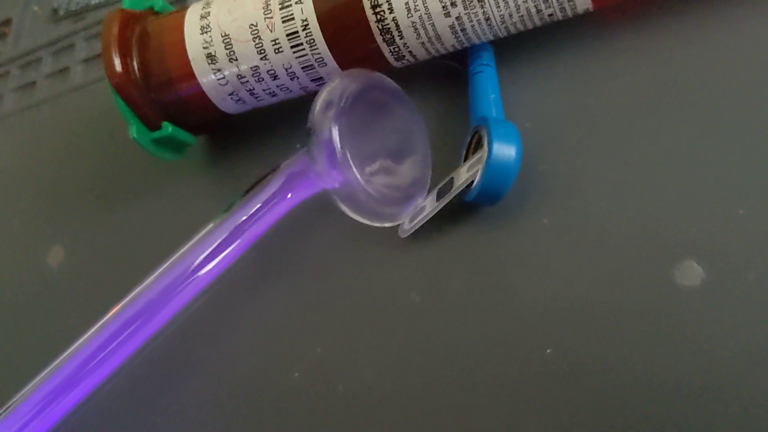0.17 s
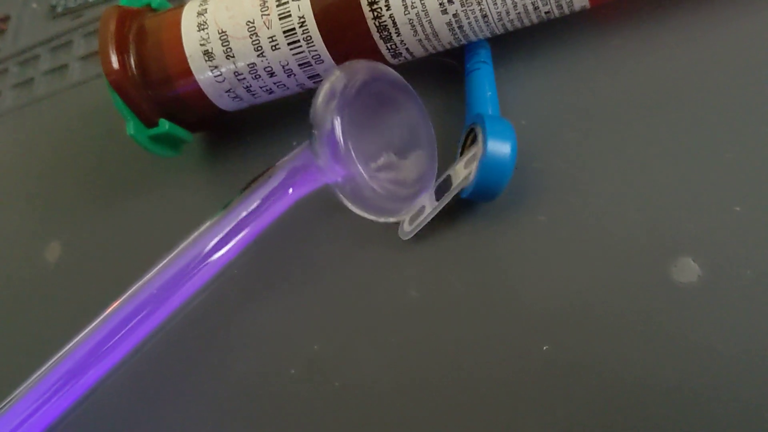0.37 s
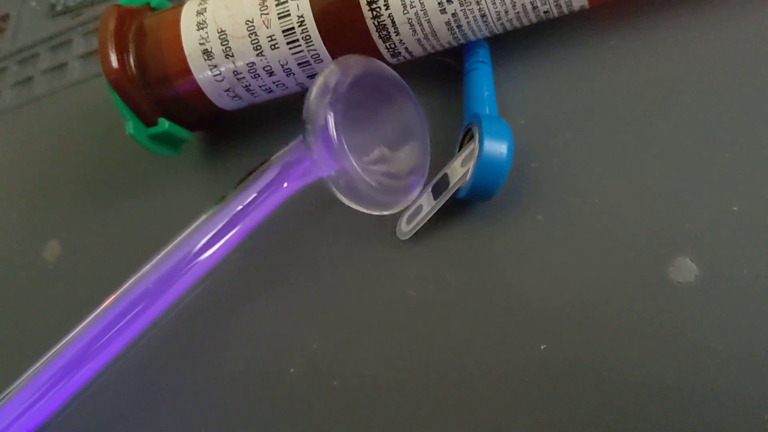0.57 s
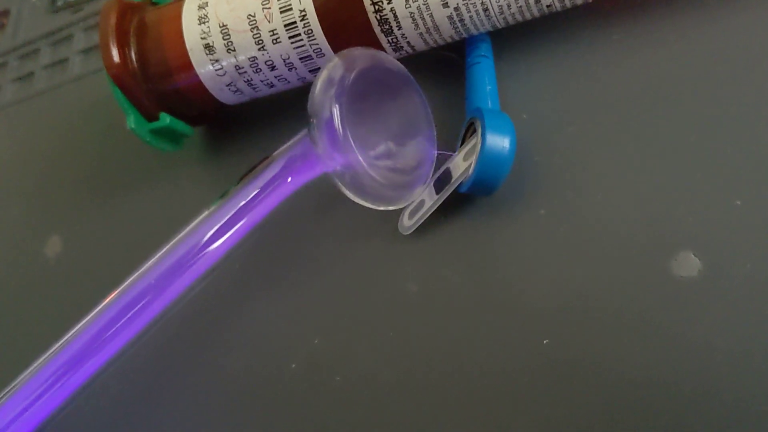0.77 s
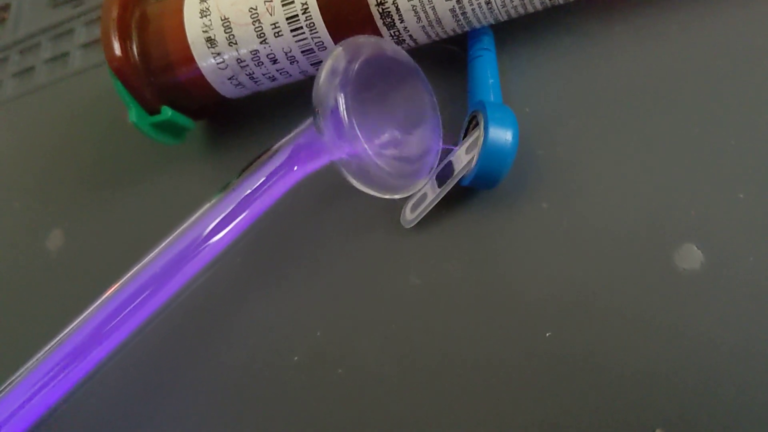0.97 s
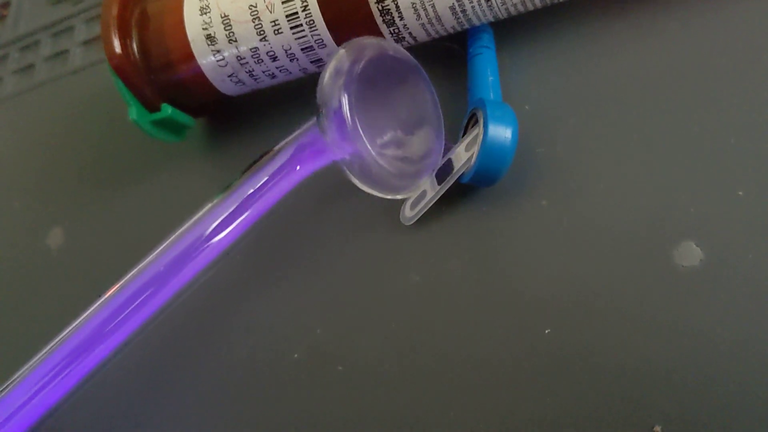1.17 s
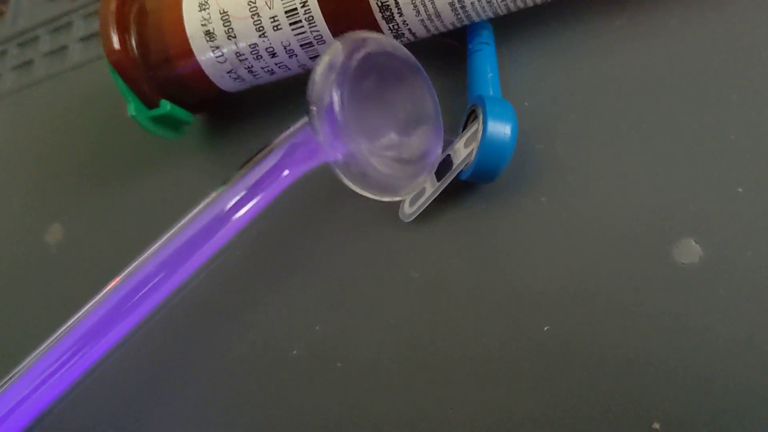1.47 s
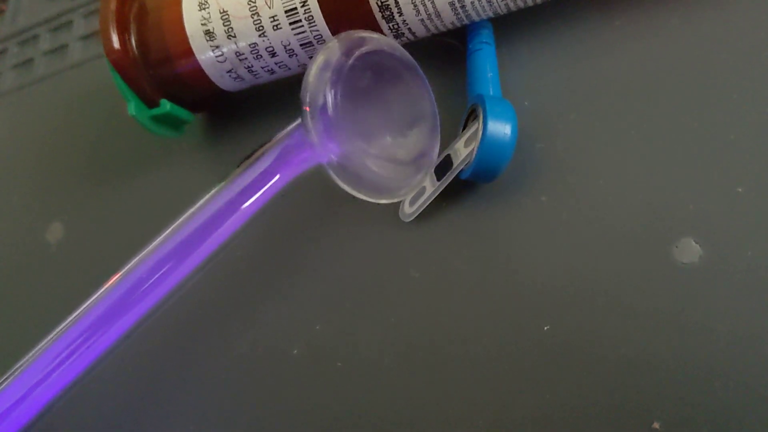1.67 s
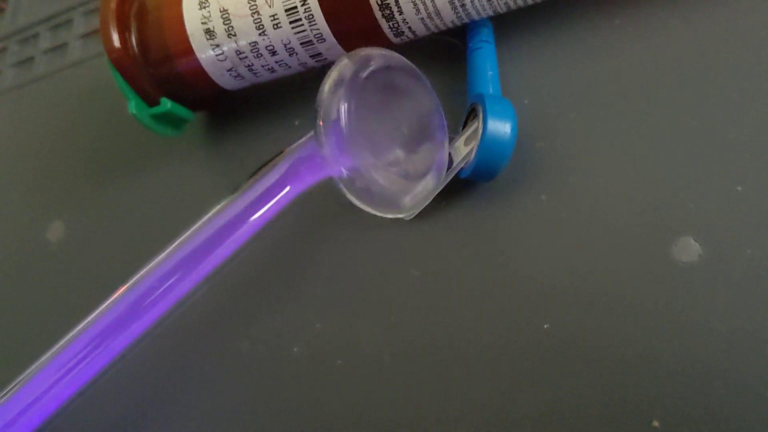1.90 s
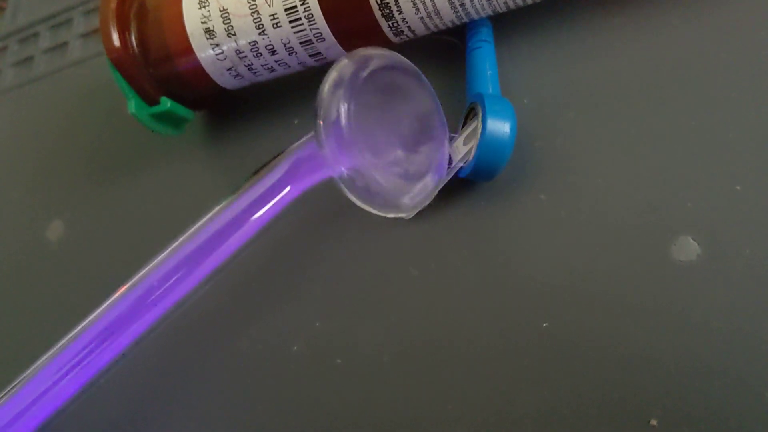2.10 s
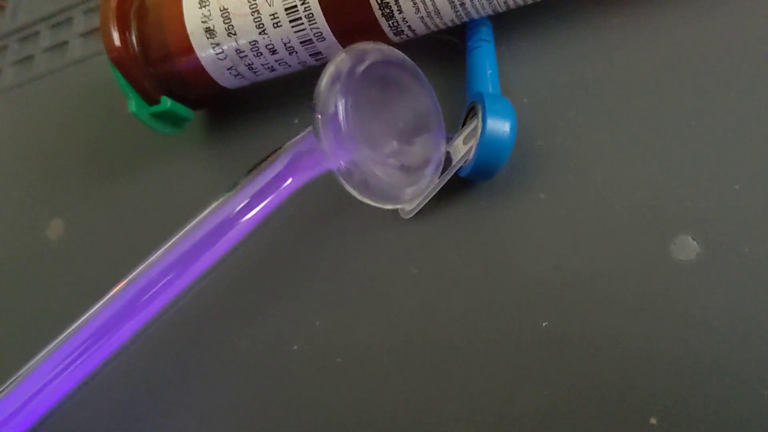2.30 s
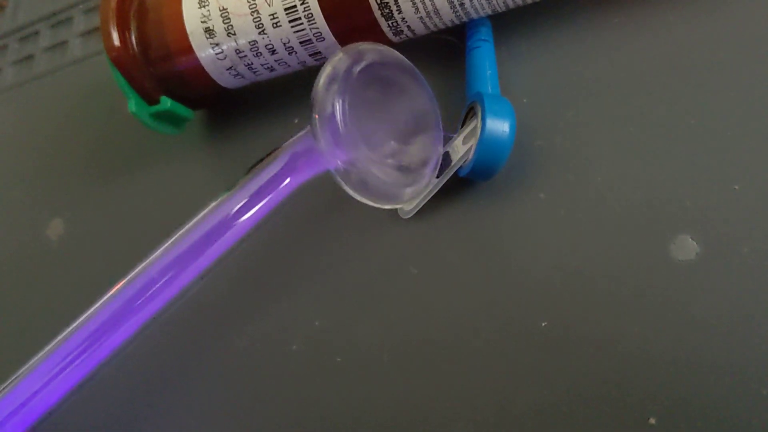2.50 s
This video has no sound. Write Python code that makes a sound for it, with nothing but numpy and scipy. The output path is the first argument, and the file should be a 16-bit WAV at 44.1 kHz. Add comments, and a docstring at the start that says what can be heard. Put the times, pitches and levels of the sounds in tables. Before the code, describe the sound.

An electrical wand buzzes with a high, hissing edge, close to the microphone in a small dry room. Sharp sparks then snap to a metal key with a few low thumps, followed by a denser, brighter crackle.

```python
"""A violet wand buzzes close to a microphone in a small dry room, over faint handling rumble: its glass
electrode discharges at every half-cycle of the mains. From 0.9 s, as it nears and touches a small metal
key, single discharges jump as loud sparks. Some discharges, loud or faint, kick the right microphone
port electrically as falling thumps. At 1.6 s the corona thins briefly to an even tick. A dense run of
brighter sparks follows at 2 s, and a last pair jumps at 2.5 s."""
import sys
import numpy as np
from scipy import signal
from scipy.fft import rfft, irfft, next_fast_len
from scipy.io import wavfile

SR = 44100
rng = np.random.default_rng(int(sys.argv[2]) if len(sys.argv) > 2 else 0)


def inscribe(sig):
    """Save sig as 16-bit PCM at rate SR to the path in sys.argv[1].

    A 1-D sig is mono; a 2-D sig holds one channel per row.
    Samples are clipped to [-1, 1] before scaling.
    """
    pcm = np.round(np.clip(np.atleast_2d(sig).T, -1, 1) * 32767)
    wavfile.write(sys.argv[1], SR, pcm.astype(np.int16))


N = 116865
FFT_SIZE = next_fast_len(N + SR // 2)
HZ = np.fft.rfftfreq(FFT_SIZE, 1 / SR)
TIME = np.arange(N) / SR
PULSE_HZ, FIRST_PULSE_S = 120.012, 0.00137  # two discharges per mains cycle
TREBLE_HZ, TOP_HZ = 13000, 16900  # boundary between body and treble; upper band limit

# Corona strength at each port: time_s, level_db, treble_over_body_db
CORONA_AT_LEFT = [(0, -49, 8), (0.1, -44, 7), (0.3, -47, 2), (0.85, -44.5, 6.5), (1.05, -40, 8),
                  (1.15, -43, 9), (1.4, -39.5, 10), (1.6, -41.5, 9.5), (1.88, -39, 10), (2.15, -40, 8),
                  (2.25, -41, 7), (2.65, -45, 6.5)]
CORONA_AT_RIGHT = [(0, -34.5, 3), (0.1, -32.5, 3), (0.16, -35.5, 0), (0.42, -31.5, -1), (0.85, -32, 0.5),
                   (0.96, -41, -4), (1.06, -35.0, -2), (1.12, -40.5, -3), (1.22, -33.5, 0.5),
                   (1.3, -31.5, 0), (1.47, -30.5, 1), (1.6, -30, 4.5), (1.88, -26, 7), (2.0, -28, 2),
                   (2.08, -43, 7), (2.18, -41, -3), (2.24, -40, 4), (2.38, -31, 1.8), (2.49, -28, 2.3),
                   (2.55, -39.5, 1.8), (2.65, -33, 3.3)]
# Sparks to the key: start_s, left_db, right_db, treble_over_body_db
SPARK_EVENTS = [(0.885, -23.5, -26, -0.5), (0.893, -40, -19, 5), (0.901, -34, -21.5, 3),
                (0.91, -29, -25.5, 5), (0.918, -23, -21, 3.5), (0.935, -28, -18, 3),
                (0.943, -29.5, -25, 5.5), (0.976, -31.5, -28, 5.5), (0.985, -31.5, -27.5, 3.5),
                (1.043, -20.5, -22.5, 5), (1.051, -24.5, -40, 7), (1.076, -25, -20.5, 7.5),
                (1.093, -29.5, -29, 7), (1.176, -27, -21.5, 6), (1.26, -28.5, -21, 2),
                (1.393, -33, -24, 5.5), (1.426, -38, -27, 0.5), (1.585, -39, -28, 9),
                (1.601, -38, -24.5, 10), (1.785, -35.5, -23.5, 13), (2.026, -26, -21.5, 12.5),
                (2.035, -18.5, -16, 9.5), (2.043, -25, -21, 8), (2.06, -23.5, -18.5, 12.5),
                (2.068, -24, -21, 7), (2.101, -27, -18.5, 9.5), (2.109, -24, -24, 6), (2.118, -26, -19, 9),
                (2.134, -23, -20.5, 9), (2.151, -24, -25, 8), (2.159, -29, -28, 9), (2.168, -30, -17, 11),
                (2.176, -17.5, -19, 9.5), (2.184, -29.5, -39, 13), (2.209, -32, -27.5, 6.5),
                (2.509, -21, -15, 11.5), (2.518, -27, -21, 6.5)]
# Electrical kicks to the microphone: start_s, level_db, polarity
THUMP_EVENTS = [(.885, -48, 1), (.918, -43, 1), (.935, -19.5, 1), (1.018, -34, 1), (1.043, -20.5, 1),
                (1.051, -29, -1), (1.851, -26, 1), (1.86, -29, 1), (2.001, -35, 1), (2.06, -33.5, -1),
                (2.068, -30, 1), (2.176, -31, -1), (2.376, -40, -1), (2.485, -34, -1)]
# Relative spectra of the three kinds of discharge: frequency_hz, left_db, right_db
CORONA_SPECTRUM = [(102, -35.5, -47.5), (830, -34, -33), (1400, -22, -27.5), (1690, -23.5, -25.5),
                   (2190, -16.5, -16.5), (2760, -18.5, -22), (3774, -23.5, -21.5), (4433, -13, -4.5),
                   (5210, -16.5, -22.5), (5890, -7.5, -22.5), (7040, -17.5, -5.5), (7470, -6, -21.5),
                   (8090, -10, -3.5), (8500, -5, -23), (9070, -25.5, -3.5), (9920, -27, -11.5),
                   (11390, -5, -2.0), (12000, -21, -5.5), (12900, -29, -5.5), (13460, -18, -2.5),
                   (15460, 6, 2), (16380, -9, -15), (16700, -40, -40.5)]
TICK_SPECTRUM = [(100, -22, -31), (900, -21.5, -27.5), (2300, -32, -22), (3280, -19, -20), (4450, 1, -7),
                 (5500, -22, -17), (6940, -2, -18), (7700, -14, -20.5), (9900, -11, 2), (11650, -15, -4.5),
                 (13000, -17.0, -15), (14900, 0.0, -4), (16500, -33, -26)]
SPARK_SPECTRUM = [(100, -41, -50), (700, -37.5, -38), (1530, -33, -28), (2500, -23, -17),
                  (3460, -21.5, -14), (4600, -20, -16.0), (5270, -18.5, -21.5), (6900, -13, -12),
                  (8260, -14.5, -8.5), (11600, -20.0, -8.0), (12700, -8.5, -13.5), (13700, -15, -4.5),
                  (15250, 18, 9), (16640, -27, -19)]
# Relative spectra of thump, rumble and hiss: frequency_hz, gain_db
THUMP_SPECTRUM = [(20, -45), (35, -23), (50, -6.5), (70, 2.5), (150, -2), (220, -0.5), (500, -4.5),
                  (950, -9.5), (1400, -5.5), (1550, -16), (2300, -9.5), (3300, -16), (5000, -36),
                  (16000, -53)]
RUMBLE_SPECTRUM = [(20, -30), (40, -13), (62, 2.5), (100, -5), (200, -12.5), (500, -18), (1000, -27.5),
                   (4000, -57)]
HISS_SPECTRUM = [(30, -13), (200, -3), (1000, 3.5), (4000, 4), (16000, -14.5)]
# Group delay of a thump, longest in the bass: frequency_hz, delay_s
THUMP_GROUP_DELAY = [(30, 0.0234), (55, 0.02), (80, .011), (110, .012), (135, 0.028), (160, .011),
                     (220, 0.0047), (350, 0.0014), (700, 0.00022), (2000, 0.00012)]
# Strength of the handling rumble: time_s, level_db
RUMBLE_ENVELOPE = [(0, -62), (.15, -56.5), (.39, -59.5), (.42, -50), (.5, -53), (.56, -58.5), (.87, -61),
                   (.97, -61.5), (1.33, -80.5), (1.65, -75), (1.75, -58.5), (1.83, -67), (1.95, -76),
                   (2.65, -85)]


def amp(db):
    """Amplitude ratio: tenfold for every 20 dB."""
    return 10 ** (np.asarray(db) / 20)


def unit_rms(x):
    """Normalisation to a root mean square of 1."""
    return x / np.sqrt(np.mean(np.abs(x) ** 2) + 1e-20)


def over_frequency(points):
    """Interpolation of (frequency_hz, value) points on a logarithmic frequency axis."""
    hz, values = np.transpose(points)
    return np.interp(np.log(HZ + 1), np.log(hz + 1), values)


def filtered(x, response):
    """Linear filtering: the spectrum is multiplied by a frequency response."""
    return irfft(rfft(x, FFT_SIZE) * response, FFT_SIZE)[..., :N]


def minimum_phase(gain):
    """Folding the cepstrum onto positive time gives a causal response with this gain."""
    cepstrum = irfft(np.log(np.maximum(gain, 1e-6)), FFT_SIZE)
    cepstrum[1:FFT_SIZE // 2] *= 2
    cepstrum[FFT_SIZE // 2 + 1:] = 0
    return np.exp(rfft(cepstrum))


def dispersion(delay_s):
    """Phase lag is the integral of group delay over frequency."""
    return np.exp(-2j * np.pi * np.cumsum(delay_s) * HZ[1])


def half_cycle(time_s):
    """Quantisation of a time to the number of the nearest mains half-cycle."""
    return np.round((time_s - FIRST_PULSE_S) * PULSE_HZ).astype(int)


def impulses(cycles, sizes):
    """Band-limited impulses (windowed sincs) on half-cycles; size is the rms over one period."""
    centres = (FIRST_PULSE_S + cycles / PULSE_HZ)[:, None] * SR
    taps = np.floor(centres).astype(int) + np.arange(-7, 9)
    shape = np.sinc(taps - centres) * np.cos(np.pi * (taps - centres) / 16) ** 2
    train = np.bincount(taps.ravel(), (shape * sizes[:, None]).ravel(), N)[:N]
    return train * np.sqrt(SR / PULSE_HZ)


def decay_envelope(train, decay_s):
    """Leaky integration spreads the energy of each impulse over an exponential decay."""
    pole = np.exp(-1 / (decay_s * SR))
    return np.sqrt(np.abs(signal.lfilter([1 - pole], [1, -pole], train ** 2)))


def room_hiss(level_db=-66):
    """Stationary coloured noise, uncorrelated between the two ports."""
    noise = rng.standard_normal((2, N))
    return amp(level_db) * unit_rms(filtered(noise, amp(over_frequency(HISS_SPECTRUM))))


def mains_hum(level_db=-64.5, end_s=0.9, fade_s=0.05):
    """The second harmonic of the mains: a pure tone that fades out."""
    fade = np.clip((end_s - TIME) / fade_s, 0, 1)
    return amp(level_db) * np.sqrt(2) * np.sin(2 * np.pi * PULSE_HZ * TIME) * fade


def handling_rumble():
    """Handling makes amplitude-modulated low noise, largely coherent between the ports."""
    noise = rng.standard_normal(N) + 0.4 * rng.standard_normal((2, N))
    envelope = amp(np.interp(TIME, *np.transpose(RUMBLE_ENVELOPE)))
    return envelope * unit_rms(filtered(noise, amp(over_frequency(RUMBLE_SPECTRUM))))


def reflections(direct, t60_s, levels_db, gap_s):
    """Diffuse reflection: convolution with exponentially decaying noise at each port (left, right)."""
    t = TIME[:SR // 3]
    tail = rng.standard_normal((2, len(t))) * amp(-60 * t / t60_s) * (t > gap_s)
    tail *= amp(levels_db)[:, None] / np.linalg.norm(tail, axis=1, keepdims=True)
    return signal.fftconvolve(direct, tail, axes=1)[:, :N]


def thumps(left_gain_db=-45):
    """Electrical coupling: some discharges kick the microphone's circuit into a falling chirp."""
    start_s, level_db, polarity = np.transpose(THUMP_EVENTS)
    kicks = impulses(half_cycle(start_s), amp(level_db) * polarity)
    gain = unit_rms(amp(over_frequency(THUMP_SPECTRUM)))
    chirps = filtered(kicks, gain * dispersion(over_frequency(THUMP_GROUP_DELAY)))
    return np.array([amp(left_gain_db) * chirps, chirps])


def discharges(cycles, levels_db, trebles_db, spectrum, crack_db, sizzle_db):
    """Source and filter: a click, a noisy crack and a short sizzle share one spectrum at each port."""
    crack_noise = rng.standard_normal(N)
    highpass = 1 / (1 + (TREBLE_HZ / (HZ + 1)) ** 40)
    smear_s = 0.0002 * HZ / TOP_HZ  # the treble trails the click
    ports = np.zeros((2, N))
    for side, lag_s in enumerate((0.0001625, 0)):  # the left port hears later
        gain = amp(over_frequency(np.array(spectrum)[:, [0, side + 1]]))
        response = minimum_phase(gain) * dispersion(smear_s + lag_s)
        treble_ratio = amp(trebles_db[side])
        body_size = amp(levels_db[side]) / np.hypot(1, treble_ratio)
        sizzle_noise = rng.standard_normal(N)
        for band, share in ((1 - highpass, 1), (highpass, treble_ratio)):
            clicks = impulses(cycles, body_size * share)
            crack = amp(crack_db) * decay_envelope(clicks, decay_s=0.00044) * crack_noise
            sizzle = amp(sizzle_db) * decay_envelope(clicks, decay_s=0.0037) * sizzle_noise
            ports[side] += filtered(clicks + crack + sizzle, unit_rms(response * band))
    return ports / np.sqrt(1 + amp(crack_db) ** 2 + amp(sizzle_db) ** 2)  # incoherent powers add


def corona_buzz(lull_s=(1.605, 1.825), scatter_db=1.82, left_scatter_db=3.1, tick_scatter_db=0.5):
    """Periodic corona discharge: the glass fires on each half-cycle that has no spark, heard as a buzz."""
    cycles = np.arange(half_cycle(TIME[-1]))
    time_s = FIRST_PULSE_S + cycles / PULSE_HZ
    shared_scatter, left_scatter = rng.standard_normal((len(cycles), 2)).T
    sparkless = ~np.isin(cycles, half_cycle(np.array(SPARK_EVENTS)[:, 0]))
    in_lull = (time_s > lull_s[0]) & (time_s < lull_s[1])
    full, thin = sparkless & ~in_lull, sparkless & in_lull

    levels_db, trebles_db = np.zeros((2, 2, len(cycles)))
    for side, curve in enumerate((CORONA_AT_LEFT, CORONA_AT_RIGHT)):
        knots_s, level_db, treble_db = np.transpose(curve)
        levels_db[side] = np.interp(time_s, knots_s, level_db) + scatter_db * shared_scatter
        trebles_db[side] = np.interp(time_s, knots_s, treble_db)
    levels_db[0] += left_scatter_db * left_scatter
    buzz = discharges(cycles[full], levels_db[:, full], trebles_db[:, full], CORONA_SPECTRUM,
                      crack_db=-6, sizzle_db=-15)

    # in the lull the corona falls back to a thin, even tick
    ticks_db = np.array([[-51.5], [-36]]) + tick_scatter_db * shared_scatter[thin]
    ticks = discharges(cycles[thin], ticks_db, trebles_db=[0.9, -0.3], spectrum=TICK_SPECTRUM,
                       crack_db=-4, sizzle_db=-24)
    return buzz + ticks


def sparks():
    """Dielectric breakdown of the air: single discharges jump to the key in step with the mains."""
    start_s, left_db, right_db, treble_db = np.transpose(SPARK_EVENTS)
    return discharges(half_cycle(start_s), [left_db, right_db], [treble_db, treble_db], SPARK_SPECTRUM,
                      crack_db=-2, sizzle_db=-27)


def scene():
    """Superposition of background, reflections and direct sound; the electrical thumps have no echo."""
    wand = corona_buzz() + sparks()
    desk = reflections(wand, t60_s=0.016, levels_db=[-2, -10], gap_s=0.0006)
    room = reflections(wand, t60_s=0.23, levels_db=[-5, -17.5], gap_s=0.0047)
    background = (handling_rumble() + mains_hum()) * amp([[-2], [0]])  # weaker on the left
    return background + room_hiss() + room + desk + thumps() + wand


def record(dry):
    """Band limiting: an ideal low-pass filter passes nothing above TOP_HZ."""
    return filtered(dry, HZ < TOP_HZ)


dry = scene()
out = record(dry)
inscribe(out)
```